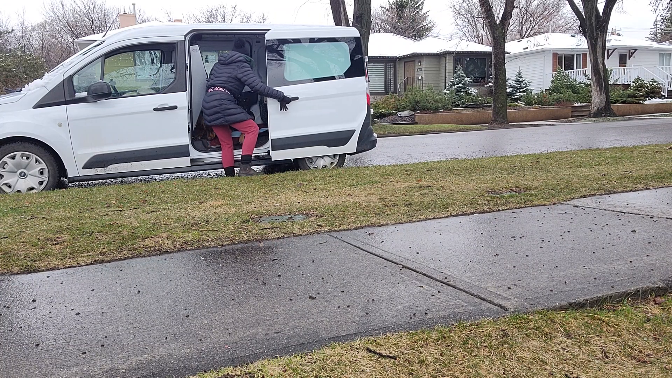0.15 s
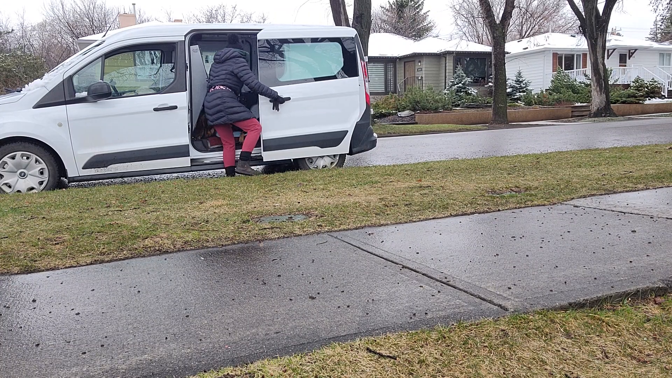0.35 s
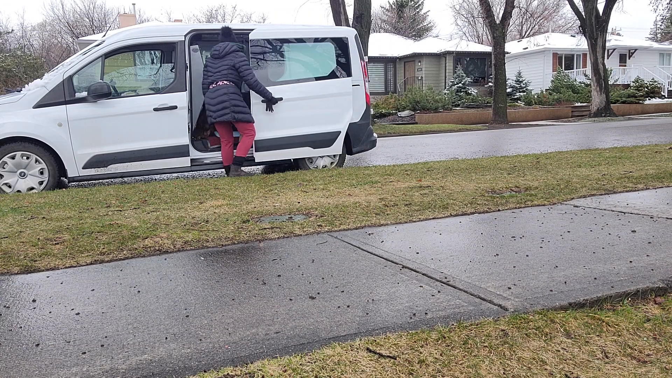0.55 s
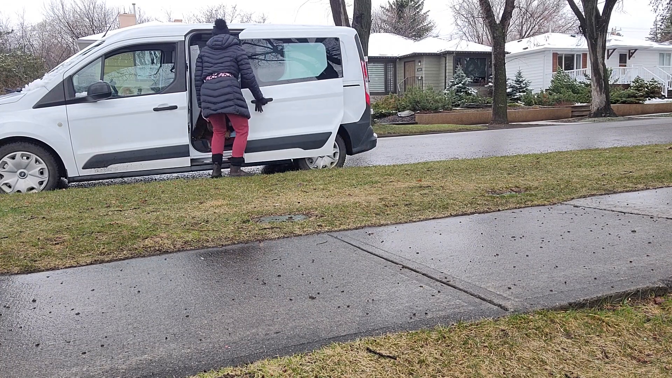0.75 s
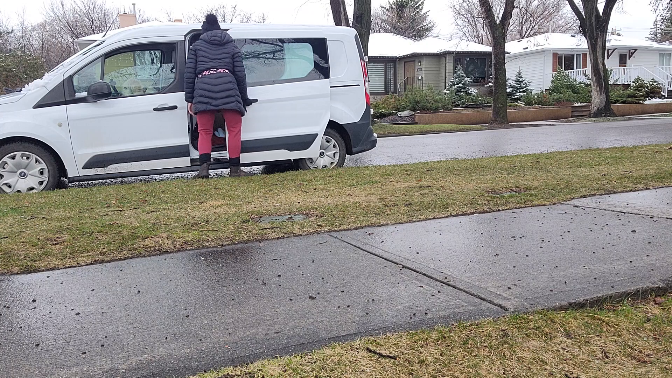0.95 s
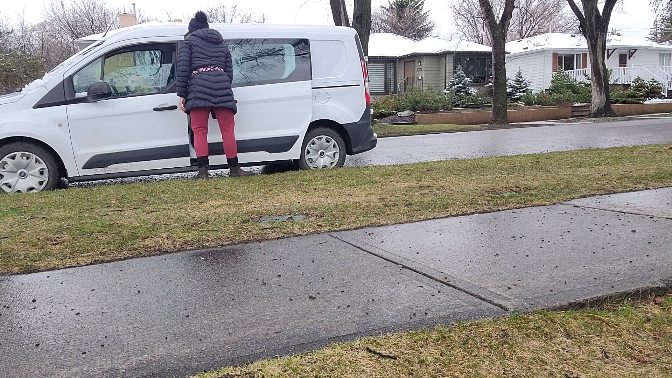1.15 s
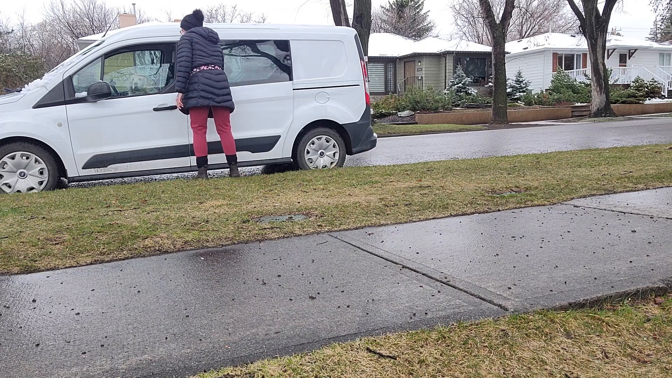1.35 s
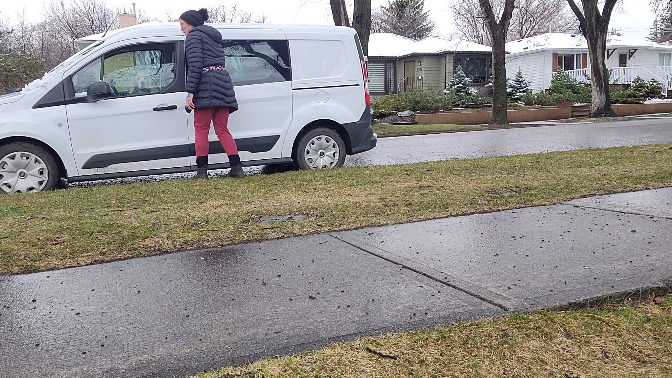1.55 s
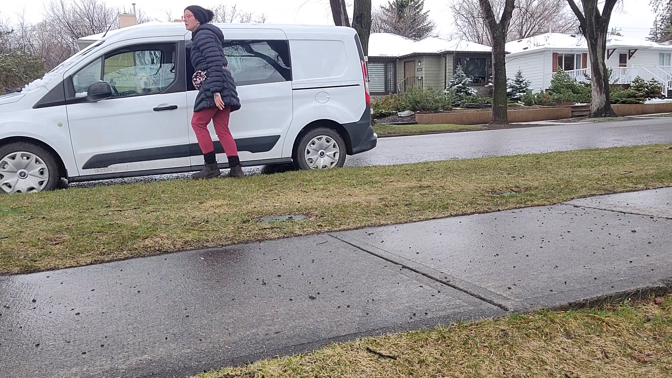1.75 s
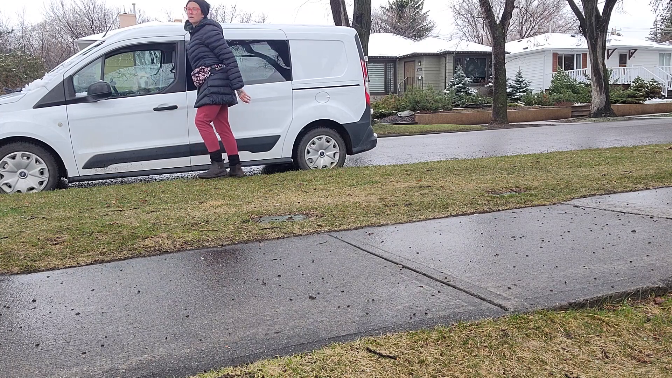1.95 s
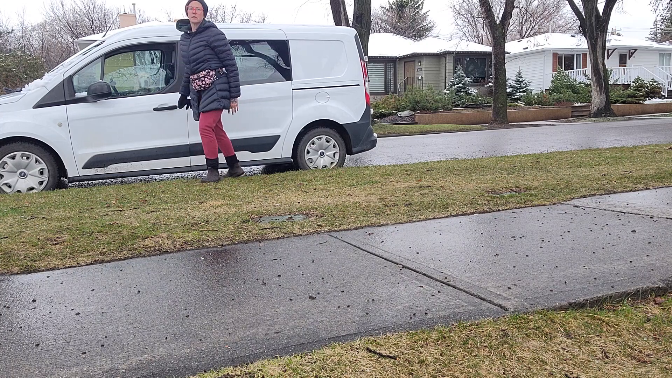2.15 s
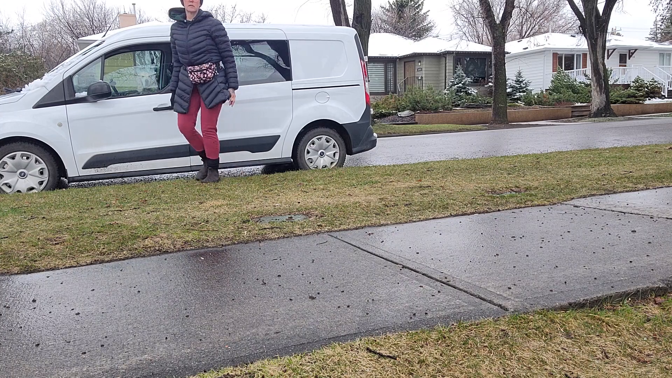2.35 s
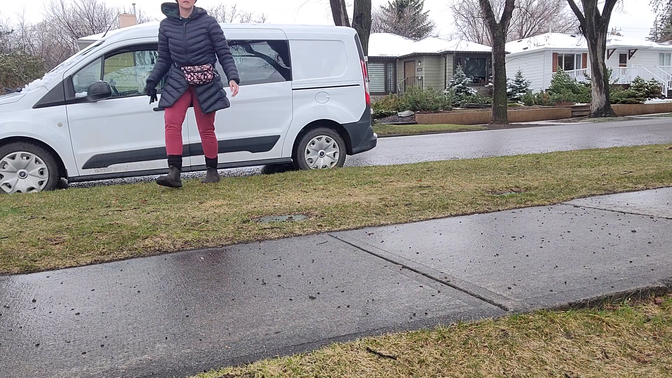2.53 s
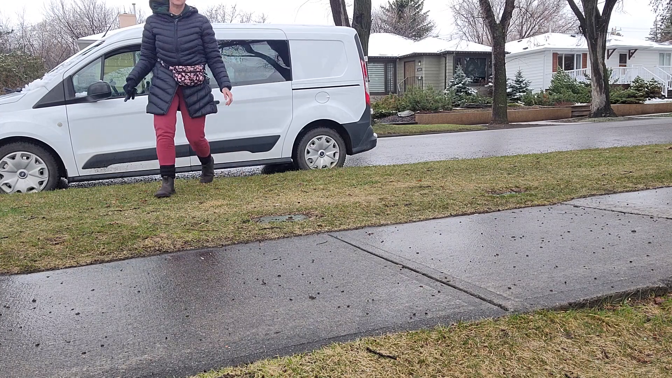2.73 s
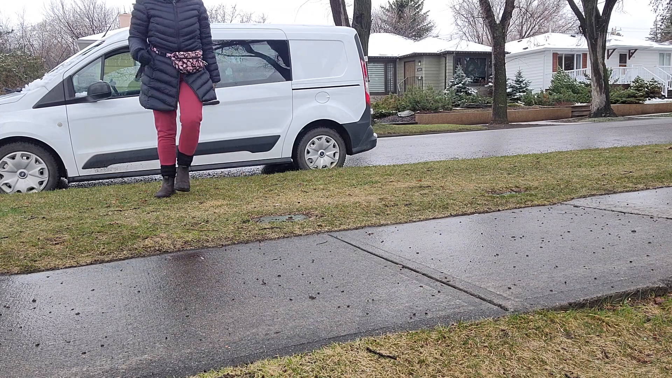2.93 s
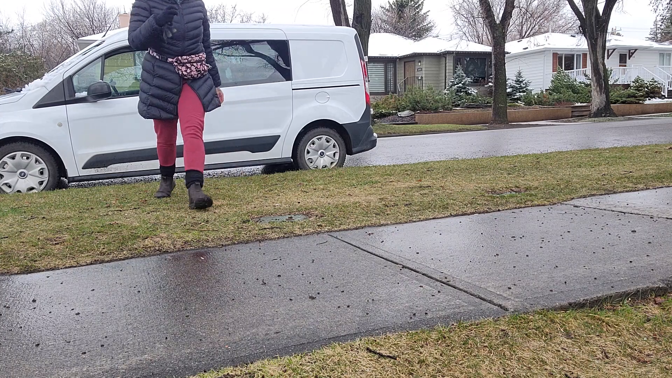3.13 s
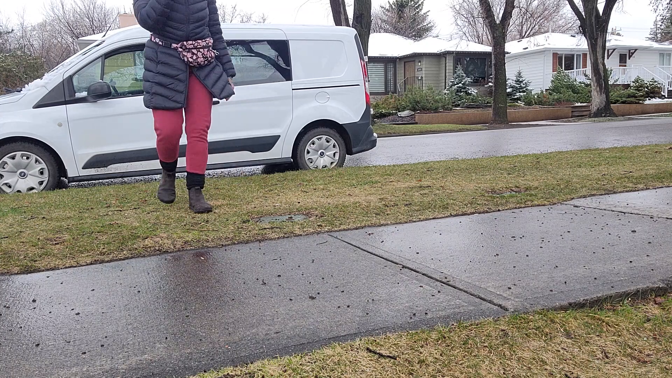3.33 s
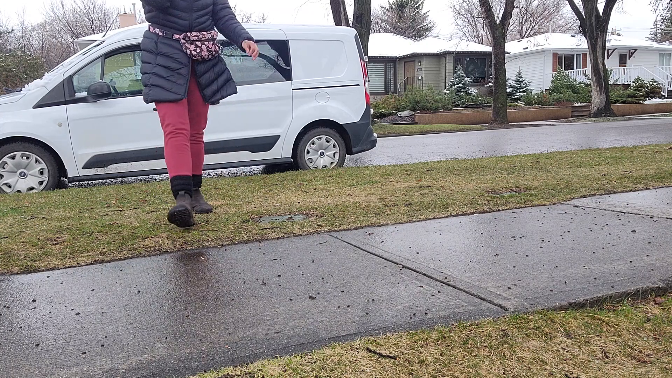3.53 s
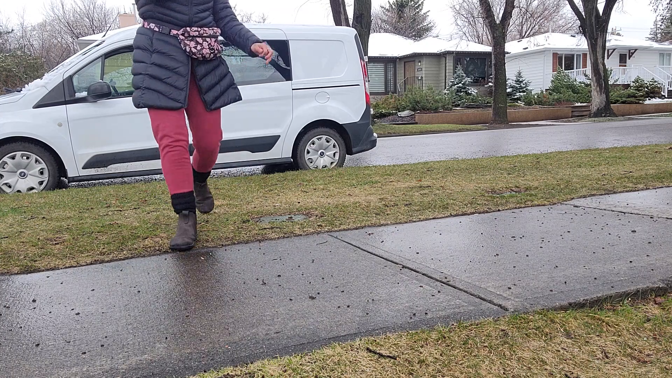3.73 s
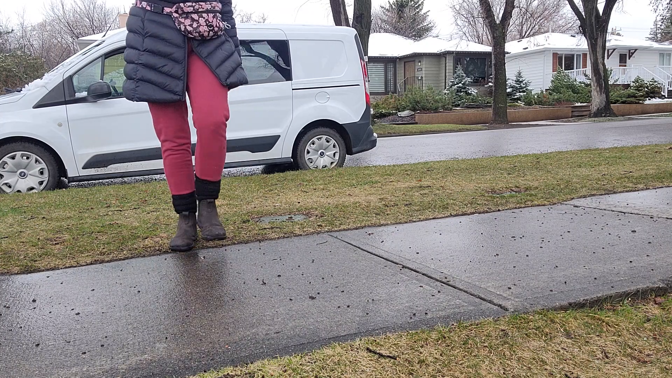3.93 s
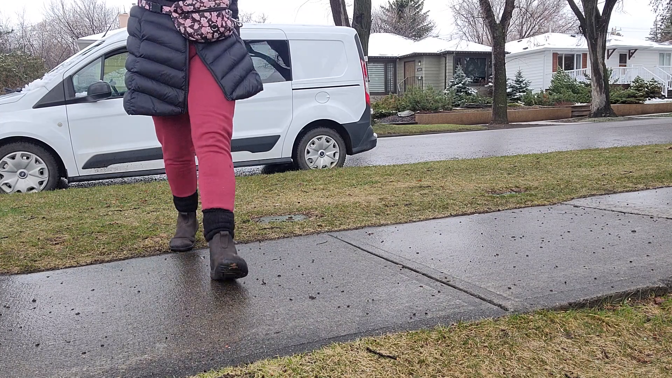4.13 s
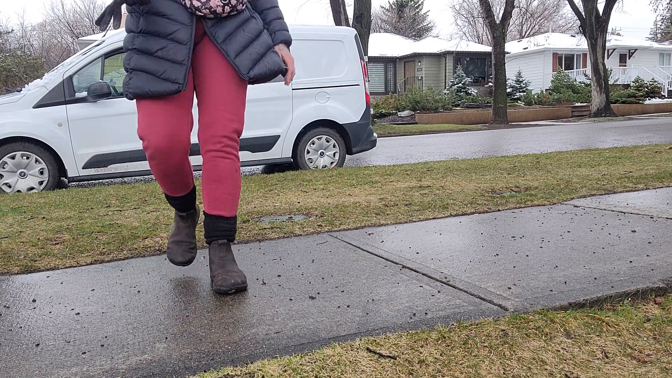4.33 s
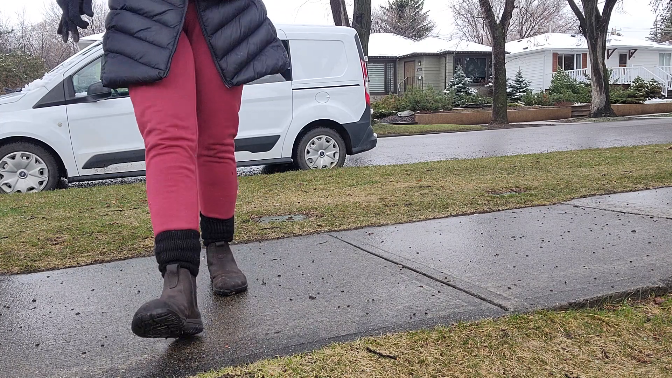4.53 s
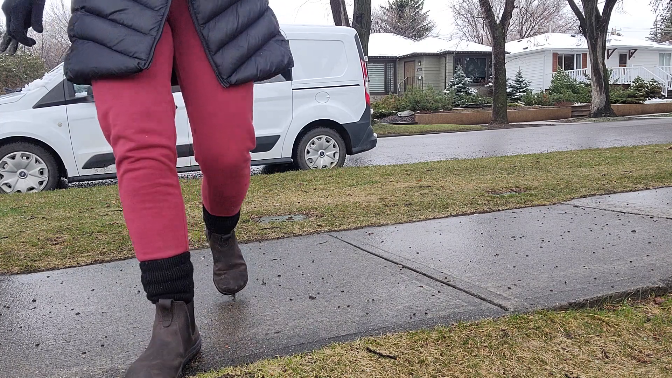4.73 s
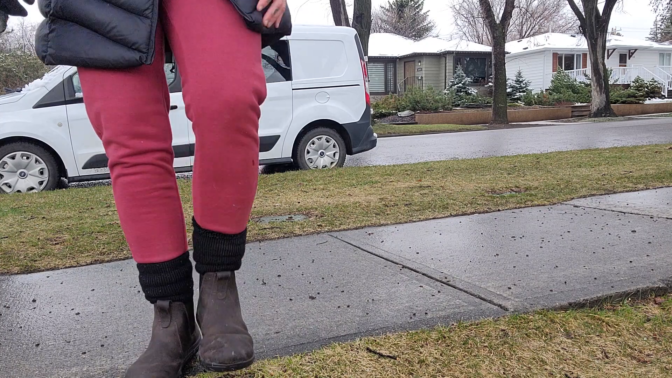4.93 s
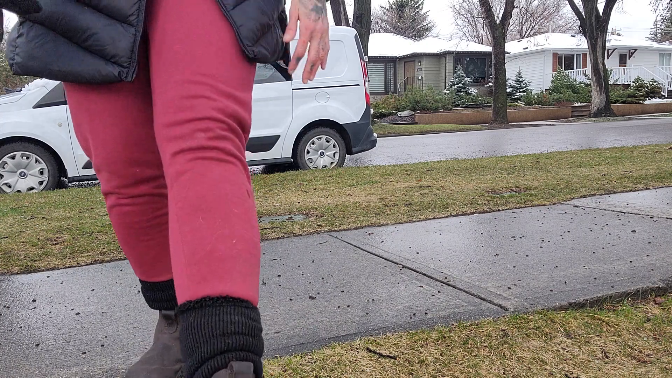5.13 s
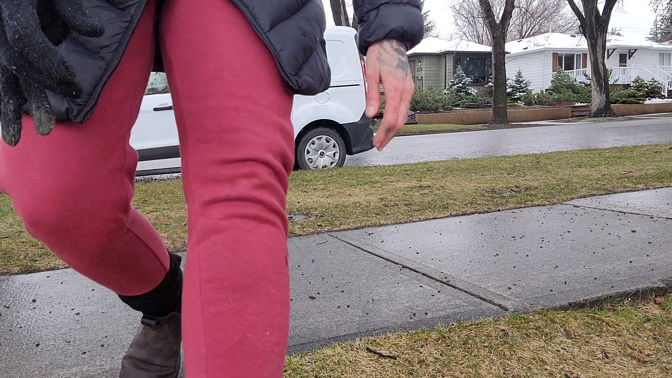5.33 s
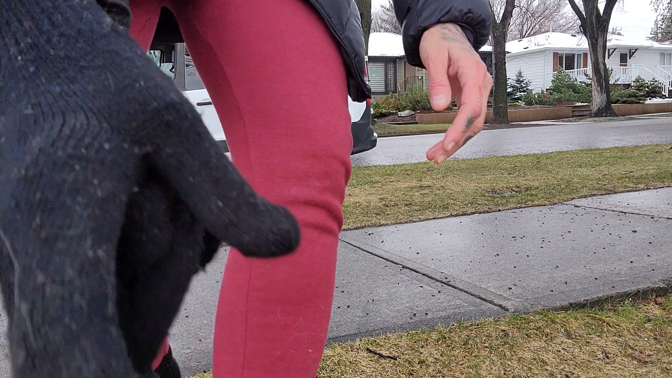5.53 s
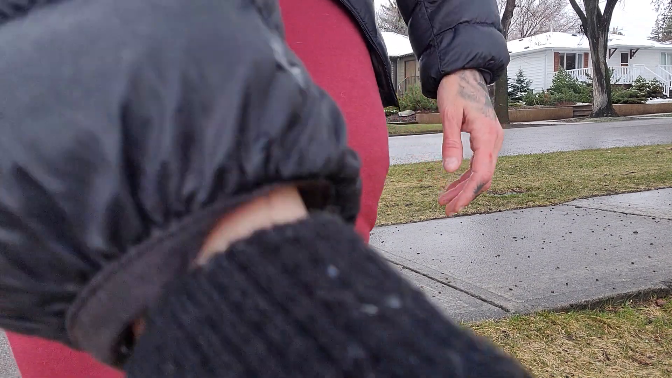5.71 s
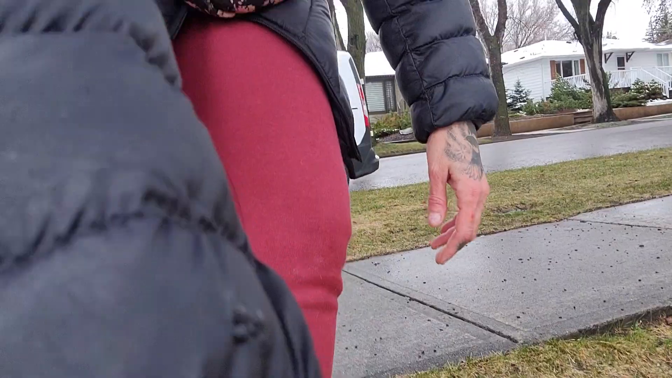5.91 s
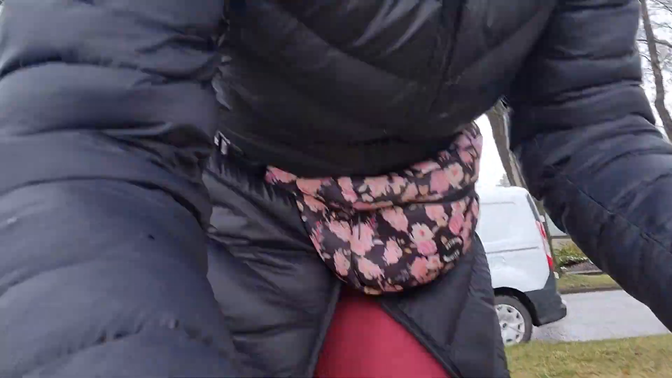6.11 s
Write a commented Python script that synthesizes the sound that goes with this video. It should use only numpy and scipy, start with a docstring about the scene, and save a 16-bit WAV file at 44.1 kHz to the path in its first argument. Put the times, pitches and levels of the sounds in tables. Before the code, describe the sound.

On a quiet street, a van side door rolls and bangs shut; birds chirp over faint traffic while someone in a swishing jacket walks up close.

```python
"""Van door slam on a quiet street

A van's sliding door rolls along its track, bumps onto the closing ramp and slams: clicks and soft pushes ring
the panel modes, with grainy noise for grit and trim. Sparrows, swept near sines with echoes, chirp in the trees
over distant traffic of banded noise and a low hum. Someone in boots and a nylon jacket walks up to the
microphone: noise snaps, short dull rings, a squeak and cloth noise."""
import sys
import numpy as np
from scipy import signal
from scipy.io import wavfile

SR = 44100
rng = np.random.default_rng(int(sys.argv[2]) if len(sys.argv) > 2 else 0)


def int16_out(signal):
    """Quantize to a 16-bit WAV file."""
    q = np.round(np.clip(np.atleast_2d(signal).T, -1, 1) * 32767)
    wavfile.write(sys.argv[1], SR, q.astype(np.int16))


N = 271964

# door panel and cabin modes: (pitch [Hz], level in the slam [dB], free ring t60 [s])
DOOR_MODES = [(31, 2, 0.16), (39.5, -4, 0.4), (49.6, 3, 0.36), (71, 3, 0.3), (103, 1, 0.1),
              (114.4, -13, 0.37), (134, -2, 0.22), (149.6, 2, 0.23), (165.8, -5, 0.26), (194.3, 5.5, 0.29),
              (222.2, -2.5, 0.22), (254.5, -8.5, 0.31), (289, -8, 0.11), (351.2, -2.5, 0.22),
              (408, -0.5, 0.058), (443, -20, 0.13), (517.4, -9.5, 0.18), (628, -20, 0.23),
              (685.5, -33, 0.26), (710.4, -25, 0.14), (930, -3.5, 0.11), (1103, -11, 0.18),
              (1283, -25, .15), (1180, -24, 0.068), (1517, -22, 0.33), (1830, -32, 0.089),
              (2246, -32, 0.23), (2320, -34, .12)]


def amp(db):
    """Decibels to a linear gain."""
    return 10 ** (np.asarray(db, float) / 20)


def rms_one(x):
    """Scale a signal to an RMS of 1."""
    return x / np.sqrt(np.mean(x ** 2) + 1e-20)


def in_time(rows):
    """One curve per column of rows (time [s], value, ..), straight between the points."""
    s, *columns = np.transpose(rows)
    return [np.interp(np.arange(N) / SR, s, column) for column in columns]


def at_hz(points, hz):
    """Read a curve of (frequency [Hz], value) along a log frequency axis."""
    points_hz, values = np.array(points).T
    return np.interp(np.log(hz), np.log(points_hz), values)


def drift(rate_hz):
    """Random wander with spread 1: noise through two equal low-pass poles, one point per 40 samples."""
    step = 40
    pole = np.exp(-2 * np.pi * rate_hz * step / SR)
    noise = rng.standard_normal(N // step + 2002)
    slow = signal.lfilter([1], [1, -2 * pole, pole * pole], noise)[2000:]   # skip the run-in
    return np.interp(np.arange(N) / step, np.arange(len(slow)), rms_one(slow))


def ring(force, hz, t60):
    """A resonator: a unit click sets a sine of height about 1 ringing for t60 seconds."""
    pole, turn = amp(-60 / (t60 * SR)), 2 * np.pi * hz / SR
    return signal.lfilter([0, np.sin(turn)], [1, -2 * pole * np.cos(turn), pole * pole], force + 1e-18)


def grains(per_s, spread_db):
    """Random clicks of uneven size and either sign."""
    sizes = amp(spread_db * np.minimum(rng.exponential(1, N), 4)) * rng.choice([-1, 1], N)
    return sizes * (rng.random(N) < per_s / SR)


def bands(source, spectrum, shape):
    """Half-octave bands, each coloured, spread left-right and shaped in time by shape(hz).

    The source holds two stereo (mid, side) pairs, so that neighbouring bands use different noise."""
    # how alike left and right are: (frequency [Hz], likeness [0-1])
    likeness = [(60, 1), (300, 0.86), (1000, 0.1), (3000, 0.39), (10000, 0.13)]
    out, edges = 0, 22 * 2 ** np.arange(0, 9.6, .5)
    for k, (low, high) in enumerate(zip(edges, edges[1:])):
        hz = np.sqrt(low * high)
        if not spectrum[0][0] / 1.3 < hz < spectrum[-1][0] * 1.3:
            continue
        band_pass = signal.butter(2, [low, high], "band", fs=SR, output="sos")
        mid, side = signal.sosfilt(band_pass, source[k % 2])
        alike = np.clip(at_hz(likeness, hz), 0, 1)
        pair = np.sqrt(1 + alike) * mid + np.sqrt(1 - alike) * side * [[1], [-1]]
        out = out + amp(at_hz(spectrum, hz)) * shape(hz) * pair
    return out


def place(x, pan_db, lag):
    """Pan a mono or stereo signal and delay the left port by lag samples (negative: left hears first)."""
    left, right = x * amp([[pan_db / 2], [-pan_db / 2]])
    return np.array([np.roll(left, lag), right])


def add(out, s, sound, pan_db=0):
    """Mix a short sound in at time s; positive pan leans left."""
    i = round(s * SR)
    out[:, i:i + len(sound)] += sound[:N - i] * amp([[pan_db / 2], [-pan_db / 2]])


def glide(rows, warble):
    """Phase, level and sample index of a tone that follows rows of (time [s], pitch [Hz], RMS level [dB], ..)."""
    s, hz, db = np.transpose(rows)[:3]
    n = np.arange(round(s[0] * SR), min(round(s[-1] * SR), N))
    edges = np.clip(np.minimum(n - n[0], n[-1] - n) / (0.0013 * SR), 0, 1)   # 1.3 ms fades against clicks
    phase = 2 * np.pi * np.cumsum(np.interp(n / SR, s, hz) * (1 + warble[n])) / SR
    return phase, edges * amp(np.interp(n / SR, s, db)) * np.sqrt(2), n


def swells(rows, rise):
    """One gain curve per level column of rows (start [s], hold [s], fall per 20 dB [s], level [dB], ..).

    A rise takes the given share of the fall time; falls under 5 ms, negative ones too, count as 5 ms."""
    t, out = np.arange(N) / SR, 0
    for s, hold_s, fall_s, *dbs in rows:
        away = np.maximum((s - t) / rise, t - s - hold_s) / max(fall_s, .005)
        out = out + amp(np.array(dbs)[:, None]) * amp(-20 * np.clip(away, 0, 6))
    return out


def street():
    """Distant traffic: a broad patchy noise floor and a low engine hum, resonated noise that comes and goes."""
    # colour of the floor: (frequency [Hz], relative level per Hz [dB])
    floor_colour = [(13, -43), (22, -31), (55, -3), (95, -0.5), (137, -4), (314, -14.5), (371, -31),
                    (415, -19.5), (762, -24), (978, -21.5), (2440, -37.5), (3220, -29.5), (3600, -28),
                    (14000, -72.5), (16500, -51)]
    # engine hum: (time [s], level [dB])
    hum_level = [(0, -53.5), (1.75, -51.5), (2.2, -57.5), (2.4, -55.5), (2.8, -63), (3.25, -59), (4.1, -56),
                 (4.5, -56), (5.12, -44), (5.29, -55.5), (5.39, -44.5), (5.57, -54.5), (5.86, -49.5),
                 (6.17, -48)]
    hum_hz, hum_width_hz, floor_db = 81.9, 31, -55.0
    together = drift(0.27)   # wander shared by all bands
    floor = bands(rng.standard_normal((2, 2, N)), floor_colour,
                  lambda hz: amp(.6 * together + 1.8 * drift(3.4) + 1.8 * drift(4.0)))
    hum = ring(rng.standard_normal(N), hum_hz, 2.34 / hum_width_hz)
    hum_gain = amp(in_time(hum_level)[0] + 1.66 * drift(7.0))
    far = amp(floor_db) * rms_one(floor) + hum_gain * rms_one(hum)
    return signal.sosfilt(signal.butter(3, 48, "high", fs=SR, output="sos"), far)


def echoes(x):
    """Direct sound plus a diffuse dying return from houses and trees, partly unlike on each side."""
    garden_t60_s, garden_db, build_up_s = .3, -5, 0.0087
    t = np.arange(SR // 2) / SR
    fade = amp(-60 * t / garden_t60_s) * np.minimum(t / build_up_s, 1)
    shared, left, right = rng.standard_normal((3, len(t))) * fade
    tails = np.array([shared + 1.7 * left, shared + 5.4 * right])
    tails /= np.sqrt(np.sum(tails ** 2, axis=1, keepdims=True))
    return x + amp(garden_db) * signal.fftconvolve(x[None], tails, axes=1)[:, :N]


def note(s, length, start_hz, top_hz, end_hz, trill_hz, db):
    """Rows (time [s], pitch [Hz], level [dB]) of one note: quick flick up, bent slide and trill."""
    flick_hz_per_s, slide_bend, trills_per_s = 80000.0, 1.1, 45.0
    attack_s, release_s = 0.0034, 0.0055
    rising_swell_db = 8   # a note that slides upward grows louder as it goes
    beak_hz, beak_db_per_octave = 3700, 2.5   # notes are loudest near this pitch
    t = np.linspace(0, length, 60)
    top_s = min(abs(top_hz - start_hz) / flick_hz_per_s, .8 * length)
    slide = np.clip((t - top_s) / (length - top_s), 0, 1) ** slide_bend
    hz = np.minimum(start_hz + flick_hz_per_s * t, top_hz) + (end_hz - top_hz) * slide
    hz = hz + trill_hz * np.sin(2 * np.pi * trills_per_s * t)
    shape = np.minimum(np.minimum(t / attack_s, (length - t) / release_s), 1)
    level_db = db - 12 * (1 - shape)
    level_db = level_db - rising_swell_db * (end_hz > top_hz) * (1 - slide)
    level_db = level_db - beak_db_per_octave * np.abs(np.log2(hz / beak_hz))
    return np.transpose([s + t, hz, level_db])


def sparrows():
    """Near sines with a fast rough warble, a second voice and rasp on wide trills, smeared by the gardens."""
    # notes that flick to a top, then slide to their end:
    # (time [s], length [s], start [Hz], top [Hz], end [Hz], trill depth [Hz], relative level [dB])
    chirps = [(0.0, 0.063, 4180, 4190, 3910, 110, -65), (0.031, 0.03, 3500, 3560, 3480, 85, -60),
              (0.17, .022, 3030, 3040, 3740, 50, -60), (.228, 0.032, 3750, 3730, 3620, 92, -64),
              (0.245, 0.045, 3440, 3410, 3240, 110, -65.5), (0.38, 0.036, 3500, 3890, 3900, 56, -65),
              (.41, 0.037, 3630, 4400, 3580, 83, -60), (.438, 0.058, 3600, 4230, 2830, 134, -63.5),
              (.414, .014, 4800, 5100, 5000, 30, -64), (0.446, 0.013, 4200, 4800, 4500, 30, -68),
              (0.476, 0.013, 5350, 5550, 5370, 57, -64), (.495, 0.029, 4900, 4910, 5300, 73, -63),
              (0.669, .024, 3360, 3900, 4340, 60, -57), (0.695, .026, 3620, 3610, 3420, 150, -61),
              (0.716, 0.021, 4100, 4120, 4640, 45, -64), (0.734, 0.024, 2250, 2270, 2800, 50, -67),
              (0.756, .022, 2700, 2780, 2350, 65, -70), (1.1, 0.069, 3830, 3840, 3570, 100, -62),
              (1.6, .025, 5000, 5010, 5400, 55, -63), (1.63, 0.025, 3900, 4040, 3970, 66, -56.5),
              (1.643, 0.016, 3560, 4530, 4600, 51, -46), (1.66, 0.028, 4500, 4750, 4500, 100, -66),
              (1.688, 0.052, 4300, 4450, 3280, 30, -53.5), (1.794, 0.051, 2570, 2560, 2900, 92, -66.5),
              (1.8, 0.045, 5240, 5100, 5340, 65, -58.5), (1.846, 0.027, 3290, 4330, 3320, 50, -57),
              (1.874, 0.02, 3250, 3340, 3190, 50, -57), (1.83, 0.086, 4700, 4750, 4750, 250, -69),
              (1.893, .03, 3800, 4270, 3400, 115, -63), (1.927, .022, 2700, 2730, 2300, 33, -64),
              (2.056, .032, 3670, 4870, 3650, 48, -63), (2.078, .025, 3780, 3720, 3930, 41, -51.5),
              (2.105, 0.032, 3630, 3730, 4200, 24, -48), (2.132, .025, 3800, 3900, 3690, 160, -61),
              (2.788, 0.046, 3630, 4080, 3740, 24, -57.5), (2.83, 0.03, 3000, 3400, 3120, 120, -60),
              (2.865, 0.033, 3300, 3270, 3820, 53, -58), (2.859, 0.03, 2540, 2960, 2780, 53, -61.5),
              (2.755, 0.051, 4830, 4920, 4640, 180, -78), (3.06, 0.032, 4400, 4400, 3700, 33, -81),
              (3.09, .055, 3650, 3660, 3420, 30, -72), (3.145, 0.061, 3500, 3480, 3050, 80, -71),
              (3.196, 0.047, 3050, 3050, 2940, 10, -63.5), (3.267, 0.027, 3490, 4520, 3500, 71, -56.5),
              (3.292, 0.019, 3505, 4430, 4200, 98, -56), (3.313, 0.043, 3600, 3710, 3520, 120, -64),
              (3.364, 0.044, 4140, 4350, 3900, 85, -67), (3.555, 0.023, 4300, 5070, 4800, 100, -70),
              (3.82, .04, 4500, 5120, 5000, 120, -69.5), (3.574, 0.064, 3390, 4070, 3090, 58, -62.5),
              (3.631, 0.038, 4300, 4400, 4800, 55, -65.5), (3.639, 0.039, 2380, 2800, 2450, 50, -68),
              (3.854, 0.085, 3560, 4180, 3750, 256, -60), (3.948, 0.053, 2720, 2720, 2580, 15, -66),
              (3.97, 0.049, 3900, 4700, 4650, 160, -61.5), (4.01, 0.054, 4400, 4410, 3520, 46, -59),
              (4.07, 0.084, 4800, 4900, 4880, 200, -68.5), (4.055, 0.019, 3840, 4140, 3930, 83, -63),
              (4.095, 0.034, 4200, 4250, 3730, 89, -61.5), (4.15, 0.09, 4960, 4970, 4850, 150, -67.5),
              (4.477, 0.053, 4050, 4410, 3720, 300, -62.5), (4.572, 0.088, 4700, 4690, 4160, 19, -63),
              (4.684, .045, 4670, 4720, 4130, 40, -58.5), (4.78, 0.055, 3600, 3950, 3480, 140, -63),
              (5.052, 0.038, 4200, 4230, 3780, 5, -60), (5.237, 0.071, 5290, 5320, 3720, 68, -63.5),
              (5.317, 0.045, 4040, 4390, 4240, 200, -62), (5.418, 0.041, 4450, 4470, 4330, 50, -61.5),
              (5.722, .022, 4200, 4490, 4300, 100, -58), (5.748, .02, 3900, 4300, 4000, 110, -60),
              (5.772, 0.026, 3680, 3660, 3260, 110, -57.5), (6.011, 0.036, 3200, 4340, 3320, 66, -60),
              (6.048, 0.024, 3430, 3590, 3920, 73, -57)]
    # thin flat peeps of a small bird: (time [s], pitch [Hz], level [dB], length [s])
    peeps = [(2.959, 7200, -75, 0.022), (3.387, 7220, -64.5, 0.0091), (3.459, 7220, -70, 0.033),
             (3.626, 7200, -65, 0.011), (3.71, 7150, -65.5, .03), (3.945, 7180, -54, 0.02),
             (4.406, 7260, -55, 0.0073)]
    hoarse_trill_hz = 150.0   # a trill this wide brings in the second voice fully
    chirp_gain, rasp_gain = amp(1.5), amp(-11)
    out, warble, rough = np.zeros((2, N)), .008 * drift(120), .35 * drift(200)
    second_warble = 0.0374 * drift(42.5) - .02   # the second side of the syrinx swings wide
    rasp = rms_one(ring(rng.standard_normal(N), hz=3980, t60=0.0028))
    for chirp in chirps:
        rows, hoarse = note(*chirp), min(chirp[5] / hoarse_trill_hz, 1)
        phase, level, n = glide(rows, warble)
        voice = (1 + hoarse * rough[n]) * np.sin(phase) + rasp_gain * hoarse * rasp[n]
        add(out, rows[0][0], chirp_gain * level * voice)
        phase, level, n = glide(rows, second_warble)
        add(out, rows[0][0], chirp_gain * hoarse * level * np.sin(phase))
    out = echoes(out[0])
    for s, hz, db, length in peeps:   # the peeps stay dry
        phase, level, n = glide([(s, hz, db), (s + length, hz, db)], .1 * warble)
        add(out, s, level * np.sin(phase))
    return out


def ticks():
    """Bright ticks of grit, grass and zip pulls: resonated noise snaps, with faint ones scattered at random."""
    # (time [s], peak level [dB], pitch [Hz], left-right [dB], t60 [ms])
    placed = [(0.0164, -57, 5500, -1.0, 9), (0.039, -50, 5100, 5, 8.6), (0.1386, -57, 5370, -7, 11.0),
              (0.2195, -54, 6700, 8, 9.5), (0.967, -47, 5870, -8, 14), (1.2426, -44, 7060, 8, 10),
              (1.421, -38.5, 7320, -6, 11.0), (1.4274, -41.5, 5160, 9, 11.0), (1.7848, -53, 5270, 3, 11.0),
              (1.962, -57, 6860, -0.5, 12), (2.179, -55.5, 6520, 0.5, 10), (2.3516, -44, 6740, 0.0, 8.1),
              (2.4381, -26.5, 7800, 6, 3.7), (2.4583, -37, 5500, 3, 11.0), (2.575, -47, 5150, 16, 4.3),
              (2.7065, -51.5, 5790, 10, 9.9), (3.1462, -53, 5780, -6, 11.0), (3.5149, -44, 5280, 2, 10),
              (3.7193, -46, 7300, 1, 14), (3.7455, -42, 7240, 8, 14), (3.7695, -42, 7490, 6, 12),
              (3.9654, -39, 7340, -4, 13), (4.0053, -32, 8060, 1, 33), (4.0507, -51, 7440, 4, 11.0),
              (4.1938, -48, 5070, 4, 16), (4.2848, -29.5, 7760, 5, 14), (4.482, -50, 5030, 8.5, 11.0),
              (4.6483, -21, 7820, 4.5, 33), (4.655, -23, 7440, -1, 33), (4.6964, -38, 6160, 5, 11.0),
              (4.7563, -41, 5020, 5, 10), (4.862, -49, 5080, 10, 8.6), (4.986, -32, 10040, 4, 8.3),
              (5, -45, 6240, 0.5, 9.8), (5.3487, -50, 5040, 1.0, 11.0), (5.44, -40, 12800, 12, 11.0),
              (5.6544, -29, 6200, 1, 12)]
    faint_per_s, faint_least_db = 3.0, -60.5
    rise_share = 0.038   # rise time against t60
    out, t = np.zeros((2, N)), np.arange(3000) / SR
    faint = [(when * (N / SR - .1) + 0.0092, faint_least_db + 6 * loud, 5000 + 2500 * pitch, 14 * pan - 7, 10.0)
             for when, loud, pitch, pan in rng.random((round(faint_per_s * N / SR), 4))]
    rows = list(placed) + faint
    noises = rng.standard_normal((len(rows), 2, len(t)))
    for (s, db, hz, pan_db, t60_ms), noise in zip(rows, noises):
        rise_ms = max(rise_share * t60_ms, .05)
        fade = amp(-60000 * t / t60_ms) * np.minimum(1000 * t / rise_ms, 1)
        snap = noise[0] * np.abs(noise[1]) * fade   # the product makes the noise spiky
        edge = np.diff(snap, prepend=0)   # brighter copy
        snap = rms_one(ring(snap, hz, 23.0 / hz)) + 1.18 * rms_one(edge)
        add(out, s - .0003, amp(db) * snap / np.abs(snap).max(), pan_db)
    return out


def knocks():
    """Boots, hands and stones: short damped sines, each begun by a dull noise click."""
    # blows, all (time [s], relative level [dB], pitch [Hz], left-right [dB]):
    # boots land on the wet path, hands knock the microphone housing, small stones clack underfoot
    steps = [(4.005, -49, 425, -4), (4.194, -45, 281, -5), (4.647, -43, 515, -4), (4.982, -48, 493, -3)]
    hands = [(5.647, -41.5, 335, 5.5), (5.803, -39, 388, -15), (5.815, -43, 550, -17),
             (5.856, -27, 269, -17.5)]
    clacks = [(2.351, -43.5, 1830, 2), (2.574, -47.5, 1580, -9), (3.42, -56, 1820, 0),
              (4.285, -51, 1350, -3), (4.986, -46, 1900, -5), (5.802, -49, 1350, -8),
              (5.858, -50, 1570, -14)]
    # their modes, all (multiple of the pitch, level [dB], t60 [ms])
    sole = [(1.0, 3, 45), (2.05, 1, 45), (2.78, -29, 27), (5.001, -14, 40)]
    housing = [(.3, -7, 103), (1.0, 1, 42), (1.62, -10, 77), (2.4, -16, 50), (3.45, -23, 74)]
    stone = [(1.0, -9.5, 24), (1.84, 7.5, 13)]
    click_db, click_t60_s, rise_s = -23, 0.013, 0.0013   # click level ahead of its low-pass
    out, t = np.zeros((2, N)), np.arange(3000) / SR
    rows = [(s, db + mode_db, hz * multiple, t60_ms, pan_db)
            for blows, modes in ((steps, sole), (hands, housing), (clacks, stone))
            for s, db, hz, pan_db in blows
            for multiple, mode_db, t60_ms in modes]
    for (s, db, hz, t60_ms, pan_db), noise in zip(rows, rng.standard_normal((len(rows), len(t)))):
        fade = amp(-60000 * t / t60_ms)
        knock = np.sin(2 * np.pi * hz * t) * fade
        knock = knock + 0.013 * ring(noise * fade, 2.3 * hz, 14.0 / hz)
        knock = knock + amp(click_db - 60 * t / click_t60_s) * signal.lfilter([1], [1, -.95], noise)
        add(out, s, amp(db) * np.minimum(t / rise_s, 1) * knock, pan_db)
    return out


def sole_squeak():
    """A wet sole squeaks: a gliding tone and its octave."""
    # (time [s], pitch [Hz], level [dB], octave against it [dB])
    squeak = [(5.66, 8100, -43, -20), (5.663, 7100, -45, -15), (5.666, 6340, -32.5, -8),
              (5.67, 5760, -34, 0), (5.673, 6350, -42, -2), (5.677, 5970, -40, -12)]
    out = np.zeros((2, N))
    phase, level, n = glide(squeak, np.zeros(N))
    s, _, _, octave_db = np.transpose(squeak)
    octave = amp(np.interp(n / SR, s, octave_db))
    add(out, s[0], level * (np.sin(phase) + octave * np.sin(2 * phase)), pan_db=-1.5)
    return out


def cloth():
    """Jacket and legs brush past each other: grainy noise in a bright, a middle and a low layer."""
    # brushes: (start [s], hold [s], fall per 20 dB [s], relative level [dB], lower part against it [dB])
    swishes = [(.03, 0.0071, -0.36, -81, 4), (0.322, 0.068, 0.13, -78.5, 1), (0.99, 0.029, 0.2, -84, -1),
               (1.18, .08, 0.24, -89, -2.5), (1.414, 0, 0.13, -81, -3), (2.344, 0.13, 0.06, -76, 8),
               (2.571, 0.03, -0.19, -83.5, 22), (2.68, 0.0031, 0.4, -90.5, 20),
               (3.211, 0.058, -0.44, -87, 26.5), (3.454, 0, 0.26, -82.5, 15),
               (3.721, 0.053, 0.035, -75, 18), (3.966, .05, 0.07, -76, 14.5), (4.263, 0.026, 0.17, -77, 12),
               (4.649, 0.029, -0.03, -62.5, 3), (4.66, 0.027, 0.12, -72, 15.5),
               (4.928, 0, 0.04, -79.5, 20.5), (4.975, 0.02, 0.06, -77, 27.5),
               (5.023, 0.04, 0.04, -69.5, 15), (5.095, .085, .045, -67, 16), (5.655, .03, .17, -66, 2),
               (5.38, 0.072, 0.13, -71, 20), (5.484, 0.18, -0.22, -78, 12.5), (6.09, 0.15, 2.5, -75, 14)]
    # steady rustle as the walker nears: (time [s], relative level [dB])
    rustle_level = [(0, -100), (2.2, -100), (4.0, -91), (5.0, -81), (5.8, -82.5), (5.95, -116), (6.17, -81)]
    # low scuffs of cloth and soles: (start [s], hold [s], fall per 20 dB [s], level [dB])
    scuffs = [(.02, 0.036, 0.15, -54), (4.99, 0.02, 0.76, -63), (5.54, 0.043, 1.1, -66.5),
              (6.08, 0.091, 0.25, -59)]
    # colours of nylon and of the low scuffs: (frequency [Hz], relative level per Hz [dB])
    nylon = [(1180, -21), (2000, -38.5), (2490, -13.5), (3980, 6), (4390, 0.5), (5720, -9), (7320, -7.5),
             (8430, -14.5), (14200, -14.5), (16100, -16), (16500, -39)]
    scuff_colour = [(200, -0.5), (320, -2.5), (500, -1.5), (800, -17)]
    middle_colour = [(900, -6), (1500, 0), (2500, -3)]
    rise, rustle_middle_db = 0.45, 11   # rise time against fall time; middle layer of the rustle
    split = [(*times, db, db + low_db) for *times, db, low_db in swishes]
    swish, swish_middle = swells(split, rise)
    rustle = amp(in_time(rustle_level)[0])
    fibres = rng.standard_normal((2, 2, N)) + 0.66 * rms_one(grains(per_s=180, spread_db=3.5))
    bright = rms_one(bands(fibres, nylon, lambda hz: amp(1.5 * drift(15))))
    middle = rms_one(bands(fibres, middle_colour, lambda hz: amp(3 * drift(15))))
    low = rms_one(bands(fibres, scuff_colour, lambda hz: amp(1.8 * drift(15))))
    out = swells(scuffs, rise) * low
    out = out + amp(13.5) * (swish + rustle) * bright
    return out + amp(-6.0) * (swish_middle + amp(rustle_middle_db) * rustle) * middle


def walker():
    """Everything the walker sets sounding: ticks, knocks, a squeak and cloth."""
    return ticks() + knocks() + sole_squeak() + cloth()


def roll():
    """Track bumps drive the door modes, damped by the rollers; grit under the wheels adds a grainy hiss."""
    # door speed on the track, as the level it gives the upper panel modes: (time [s], level [dB])
    speed_level = [(0.16, -90), (0.3, -49), (0.58, -63.5), (0.75, -51.5), (0.94, -49.5), (1.1, -41),
                   (1.25, -41.5), (1.4, -41.5), (1.44, -34)]
    # roller force on the panel: (frequency [Hz], relative level [dB])
    rumble = [(40, -34), (70, -27.5), (110, 1), (160, 4.5), (250, -12.5), (400, -2.5), (500, -4.5),
              (600, -20), (750, -12), (1100, -27.5), (2200, -36.5)]
    # colour of the grit: (frequency [Hz], relative level per Hz [dB])
    grit_colour = [(350, -20), (600, -0.5), (869, -4), (1240, -15), (2000, -31.5), (2190, -24.5),
                   (2980, -33.5), (7000, -68.5), (9100, -63), (15400, -120)]
    # rollers jolt over joints and the closing ramp:
    # (start [s], hold [s], fall per 20 dB [s], low modes level [dB], relative grit level [dB])
    jolts = [(0.265, 0.014, -0.07, -33.5, -65), (0.32, 0.034, 0.1, -38.5, -59), (.98, 0.02, 0.23, -61, -55),
             (1.075, 0.012, 0.26, -38, -64), (1.17, 0.039, 0.05, -25.5, -54.5),
             (1.42, 0.015, 0.2, -39.5, -67)]
    # a roller squeals on the ramp: (start [s], hold [s], fall per 20 dB [s], level [dB])
    ramp_ring = (1.362, .015, .08, -33)
    jolt_rise = 0.42   # rise time against fall time
    middling_db = -50   # speed level at which the next two levels hold
    low_db, low_follows = -42, 0.22   # low modes; share of the speed swing they follow
    grit_db, grit_follows = -65.5, 0.67   # grit likewise, ahead of its gain
    speed_db, = in_time(speed_level)
    swing_db = speed_db - middling_db
    jolt_low, jolt_grit = swells(jolts, jolt_rise)
    moving = np.interp(np.arange(N) / SR, [.14, .2, 1.44, 1.46], [0, 1, 1, 0])
    bumps = grains(per_s=720, spread_db=3.0)
    modes = [amp(at_hz(rumble, hz)) * ring(bumps, hz, 0.43 * t60) * (-1) ** k
             for k, (hz, _, t60) in enumerate(DOOR_MODES)]
    low, upper = rms_one(sum(modes[:13])), rms_one(sum(modes[13:]))
    clicks = [grains(per_s=3000, spread_db=1.5), grains(per_s=2000, spread_db=1.5)]   # mid, side
    grit = bands(np.array([clicks] * 2), grit_colour, lambda hz: amp(7.5 * drift(12)))
    sings = swells([ramp_ring], jolt_rise)[0] * rms_one(ring(bumps, hz=505, t60=.35))
    low_gain = amp(low_db + low_follows * swing_db) + jolt_low
    grit_gain = amp(6.0) * (amp(grit_db + grit_follows * swing_db) + jolt_grit)
    return moving * (sings + low_gain * low + amp(speed_db) * upper + grit_gain * rms_one(grit))


def slam():
    """Each blow is a soft push into all door modes and shakes the trim into a noisy crash that dies by band."""
    # door blows, from light knocks while it rolls to the latch and its rebounds: # (time [s], strength [dB],
    # contact hardness [Hz], relative crash of loose trim [dB])
    blows = [(0.265, -66, 250, -57), (0.328, -54, 400, -56), (1.167, -49, 300, -37),
             (1.186, -68, 300, -39.5), (1.441, -32, 800, -42.5), (1.449, -25.5, 1000, -39.5),
             (1.455, -32.5, 1500, -37), (1.461, -18.5, 900, -29.5), (1.465, -20, 1200, -17.5),
             (1.473, -15.5, 500, -59), (1.493, -27.5, 700, -31), (1.503, -27, 400, -45),
             (1.51, -22, 400, -39), (1.534, -33.5, 400, -42), (1.562, -25.5, 250, -43.5),
             (1.580, -30.5, 393, -50.5), (1.596, -43.5, 200, -60)]
    # colour of the crash: (frequency [Hz], relative level per Hz [dB])
    crash_colour = [(300, -3), (420, -8), (750, -24.5), (1200, -23), (1700, -26.5), (3000, -29.5),
                    (4500, -27.5), (7000, -37.5), (9500, -44), (13000, -45.5), (16000, -47.5)]
    # how long the crash rings: (frequency [Hz], t60 [s])
    crash_t60 = [(300, 0.19), (1000, 0.24), (4000, 0.08), (8000, 0.096), (15000, 0.069)]
    # latch pawl: (time [s], pitch [Hz], level [dB], t60 [s])
    latch_pings = [(1.455, 3000, -28, 0.027), (1.502, 4540, -29, .03), (1.521, 4300, -41.5, 0.043),
                   (1.56, 4070, -44, .02)]
    force, shakes = np.zeros((2, N)), np.zeros(N)
    for s, db, hard_hz, crash_db in blows:
        push = np.arange(2000) * 2 * np.pi * hard_hz / SR
        push = push * np.exp(-push)   # a harder contact is shorter and brighter
        add(force, s, amp(db) * push / push.sum())
        shakes[round(s * SR)] = amp(crash_db)
    body = sum(amp(db) * ring(force[0], hz, t60) * (-1) ** k for k, (hz, db, t60) in enumerate(DOOR_MODES))

    def dying(hz):
        """Every shake starts a decay of this band's own length."""
        return signal.lfilter([1], [1, -amp(-60 / (at_hz(crash_t60, hz) * SR))], shakes + 1e-18)

    pings = np.zeros((2, N))
    for s, hz, db, t60 in latch_pings:
        add(pings, s, amp(db) * ring(signal.unit_impulse(3000), hz, t60))
    rattle = amp(1.9 * drift(280)) * rng.standard_normal((2, 2, N)) * [[1], [.4]]   # mid, weaker side
    return body + pings + amp(23) * bands(rattle, crash_colour, dying)


def scene():
    """Each source reaches the two ports with its own pan and lag; the walker shares the rolling door's lag."""
    door_lag = -5
    out = place(street(), pan_db=-1.8, lag=8)
    out = out + place(sparrows(), pan_db=3.0, lag=-20)   # the trees stand to the left
    out = out + place(walker(), pan_db=.1, lag=door_lag)
    out = out + place(roll(), pan_db=-1.8, lag=door_lag)
    return out + place(slam(), pan_db=-2.2, lag=-2)   # the shut door is nearer the centre


def record(dry):
    """The microphone port colours the treble with resonances; the top is cut steeply."""
    # port resonances: (frequency [Hz], width [Hz], gain [dB])
    port = [(6950, 930, 4), (8650, 6300, -1.5), (13540, 3230, 5)]
    for hz, width_hz, db in port:
        dry = dry + (amp(db) - 1) * signal.lfilter(*signal.iirpeak(hz, hz / width_hz, SR), dry)
    # 60 dB down from 16.7 kHz up
    return signal.sosfilt(signal.cheby2(12, 60, 16700, fs=SR, output="sos"), dry)


dry = scene()
out = record(dry)
int16_out(out)
```